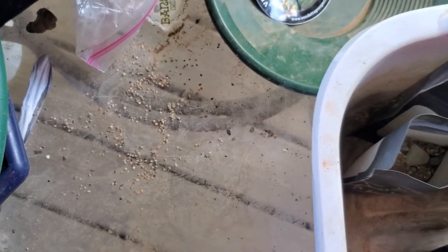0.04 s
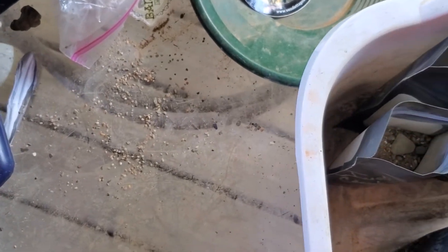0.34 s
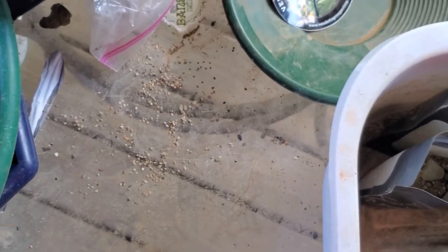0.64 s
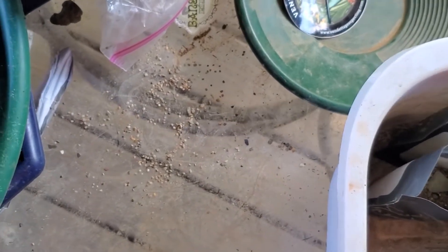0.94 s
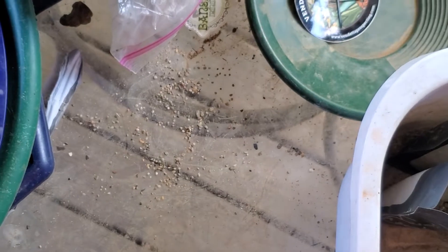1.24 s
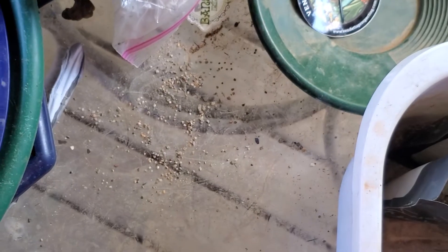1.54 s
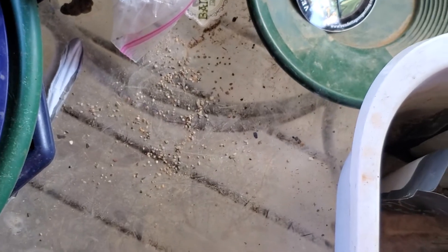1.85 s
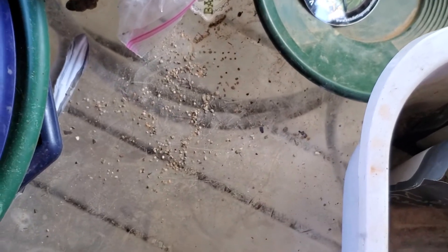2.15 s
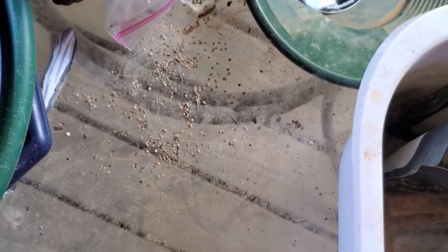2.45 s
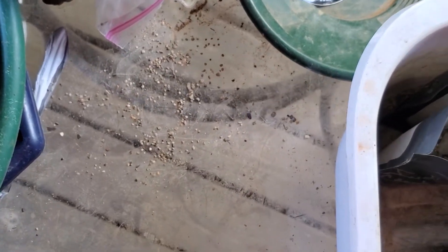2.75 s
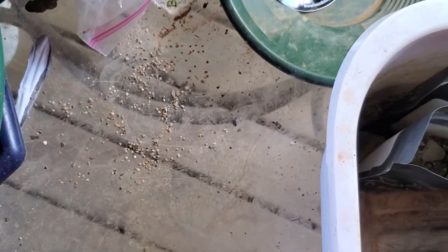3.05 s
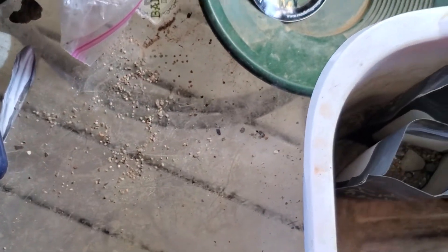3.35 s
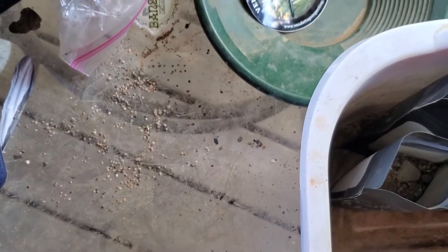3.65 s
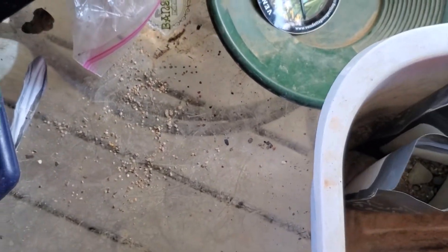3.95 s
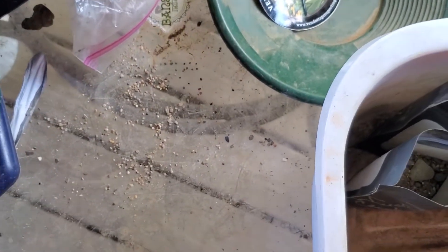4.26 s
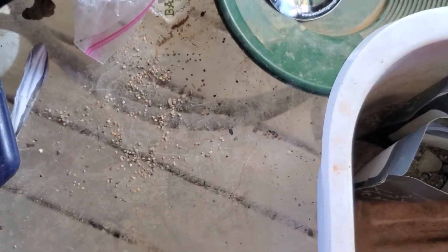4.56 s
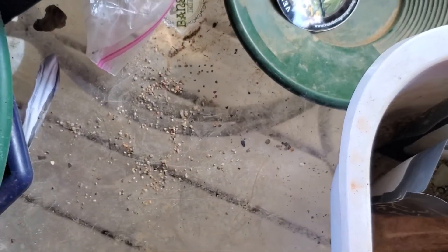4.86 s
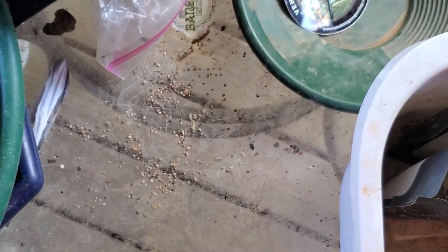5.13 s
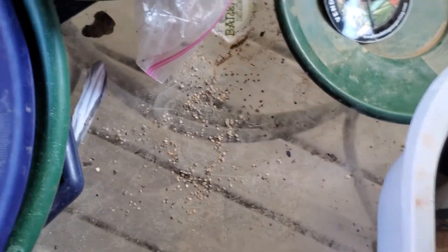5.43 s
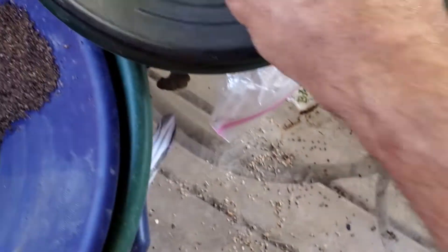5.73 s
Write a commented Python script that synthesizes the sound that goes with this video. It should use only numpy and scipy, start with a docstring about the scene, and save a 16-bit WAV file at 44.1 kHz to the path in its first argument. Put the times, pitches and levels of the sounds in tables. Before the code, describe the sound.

Small hard pieces and dirt are handled into plastic bags, with light clicks, crinkles and hollow taps over a low steady hum.

```python
"""Small hard pieces into plastic bags.

Pieces and dirt are handled close to a two-port microphone. Sliding plastic scuffs in tiny crackles,
flexing plastic snaps in rushes of stick-slips, pieces ring a hollow container, handling gives low bumps.
A distant motor hums in room noise; a fine high hiss, perhaps an insect, comes in spells and short zips."""
import sys
import numpy as np
from scipy import signal
from scipy.fft import rfft, irfft
from scipy.io import wavfile
from scipy.ndimage import uniform_filter1d, map_coordinates

SR = 44100
rng = np.random.default_rng(int(sys.argv[2]) if len(sys.argv) > 2 else 0)


def dump_mix(stems):
    """Bounce the given channels to the path in sys.argv[1] as a 16-bit WAV at rate SR."""
    frames = np.atleast_2d(stems).T  # one column per channel
    limited = np.clip(frames, -1, 1)  # hard clip at full scale
    pcm = np.round(limited * 32767).astype(np.int16)
    wavfile.write(sys.argv[1], SR, pcm)


N = 259749
TIME_S, FREQ_HZ = np.arange(N) / SR, np.fft.rfftfreq(N, 1 / SR)


def gain_of(db):
    """Decibels to amplitude."""
    return 10 ** (np.asarray(db) / 20)


def unit_rms(x):
    """Scale to rms 1."""
    return x / np.sqrt(np.mean(x ** 2) + 1e-20)


def at_hz(table, hz):
    """Interpolate on a log-frequency axis."""
    f, value = np.transpose(table)
    return np.interp(np.log(hz + 1), np.log(f + 1), value)


def add(mix, start_s, sound):
    """Mix a sound in at start_s."""
    part = mix[max(round(start_s * SR), 0):][:len(sound)]
    part += sound[:len(part)]


def coloured(x, spectrum):
    """Filter by a spectrum table; rms 1."""
    return unit_rms(irfft(rfft(x) * gain_of(at_hz(spectrum, FREQ_HZ)), N))


def drift(hz):
    """Random drift up to about hz; rms 1."""
    return unit_rms(irfft(rfft(rng.standard_normal(N)) * np.exp(-(FREQ_HZ / hz) ** 2), N))


def burst(x, db):
    """Scale to the energy of 5 ms at db."""
    return gain_of(db) * x / np.sqrt(np.sum(x ** 2) / (.005 * SR) + 1e-20)


# Room noise spectrum (frequency [Hz], gain [dB])
AIR_SPECTRUM = [(20, -27), (40, -2.5), (60, -3), (95, -7), (170, -9.5), (260, -17.5), (500, -21.5),
                (1000, -27.5), (1700, -27), (3300, -24), (4100, -26), (5100, -25), (5700, -33), (7400, -37),
                (16000, -54)]


def room_noise(start_db=-46.0, sink_db_per_s=0.51, swell_db=1, rumble_hz=70, shared_hz=700):
    """Slowly sinking noise: alike at both ports in the upper bass, unrelated in rumble and treble."""
    left, other = rfft(rng.standard_normal((2, N)))
    coherence = .9 / (1 + (FREQ_HZ / shared_hz) ** 4) * FREQ_HZ ** 2 / (FREQ_HZ ** 2 + rumble_hz ** 2)
    right = coherence * left + np.sqrt(1 - coherence ** 2) * other
    level_db = start_db - sink_db_per_s * TIME_S + swell_db * drift(0.49)
    return gain_of(level_db) * coloured(irfft(np.array([left, right]), N), AIR_SPECTRUM)


# Motor orders (multiple of motor speed, level [dB], width [Hz])
MOTOR_ORDERS = [(2, -51, 1.74), (3, -54, 2.3), (5, -73.5, 4.6)]


def motor_hum(motor_hz=67.8, drone_hz=57.6, drone_db=-49.5, drone_width_hz=14, waver=0.27):
    """Low orders of a distant motor over a rough drone, wavering in level and phase."""
    tones = [(order * motor_hz, db, width_hz) for order, db, width_hz in MOTOR_ORDERS]
    out = np.zeros(N)
    for hz, db, width_hz in tones + [(drone_hz, drone_db, drone_width_hz)]:
        amplitude = gain_of(db) * np.sqrt(2) * (1 + waver * drift(2 * width_hz))
        out += amplitude * np.sin(2 * np.pi * hz * TIME_S + 0.2 * drift(width_hz))
    return out


# Hiss spells (start [s], end [s], relative level [dB])
HISS_SPELLS = [(-0.6, 0.43, -45), (1.0, 2.68, -44.5), (3.2, 4.87, -46), (5.66, 7.0, -49.5)]


def spell_envelope(soft_db=-10, swell_s=0.62, fade_db_per_s=97, floor_db=-63):
    """Each spell starts soft, swells, holds and dies away to a faint floor."""
    envelope = gain_of(floor_db)
    for start_s, end_s, db in HISS_SPELLS:
        softness = np.clip(1 - (TIME_S - start_s) / swell_s, 0, 1)
        outside_s = np.maximum(np.maximum(start_s - TIME_S, TIME_S - end_s), 0)
        envelope = np.hypot(envelope, gain_of(db + soft_db * softness - fade_db_per_s * outside_s))
    return envelope


# Hiss spectrum (frequency [Hz], gain [dB])
HISS_SPECTRUM = [(5000, -11), (7500, -26), (9500, -15), (11000, -4), (12500, 5), (14000, 9), (15300, 8.5),
                 (16000, -34)]
# Steady narrow bands (centre [Hz], width [Hz], level [dB])
HISS_BANDS = [(8600, 310, -66.5), (15800, 390, -58.5)]
# Zips (start [s], hold [s], level [dB])
ZIP_EVENTS = [(0.87, 0.026, -41.5), (0.951, 0.065, -37.5), (1.077, 0.015, -40.5), (1.145, 0.016, -39),
              (3.159, 0.079, -37), (3.355, .01, -39), (3.436, .01, -44), (3.505, .01, -42),
              (5.501, .01, -43), (5.685, .01, -44), (5.741, .01, -42.5)]
# Zip spectrum (frequency [Hz], gain [dB])
ZIP_SPECTRUM = [(9000, -27), (11000, -13.5), (12300, -8), (13500, -1.5), (15000, 0), (16000, -17)]


def high_hiss(gain_db=2, flicker_db=1, echo=0.3, echo_s=0.001, rise_s=0.0025, fall_s=0.018):
    """Fine hiss, perhaps an insect: flickering spells and short zips over steady narrow bands."""
    wide, narrow, zip_noise = rng.standard_normal((3, 2, N))
    wide = wide + echo * np.roll(wide, round(echo_s * SR), axis=1)  # near reflection: comb filter
    out = spell_envelope() * gain_of(gain_db + flicker_db * drift(50)) * coloured(wide, HISS_SPECTRUM)
    for hz, width_hz, db in HISS_BANDS:
        band = np.exp(-((FREQ_HZ - hz) / width_hz) ** 2 / 2)
        out += gain_of(db) * unit_rms(irfft(rfft(narrow) * band, N))
    zip_envelope = np.zeros(N)
    t = TIME_S[:SR // 5]
    for start_s, hold_s, db in ZIP_EVENTS:
        attack = 1 - np.exp(-t / rise_s)
        release = np.exp(-np.maximum(t - hold_s, 0) / fall_s)
        add(zip_envelope, start_s, gain_of(db) * attack * release)
    return out + zip_envelope * coloured(zip_noise, ZIP_SPECTRUM)


# Handling bumps (time [s], pitch [Hz], level [dB])
BUMP_EVENTS = [(0.148, 60, -32.5), (0.249, 84, -31.5), (0.338, 71, -24), (0.394, 74, -22.5),
               (0.892, 66.4, -33.5), (1.316, 73.5, -25.5), (1.424, 220, -32), (2.639, 83, -37.5),
               (3.221, 187, -27.5), (3.24, 72.5, -35), (3.26, 157, -33), (3.758, 85, -30),
               (3.765, 176, -28.5), (3.784, 88.6, -23), (4.513, 111, -19.5), (4.547, 64, -30),
               (5.142, 73, -33.5), (5.265, 78, -31.5)]


def handling_bumps(cycles=1.53):
    """Each soft bump is a brief low sway under a Gaussian envelope."""
    out = np.zeros(N)
    for time_s, hz, db in BUMP_EVENTS:
        length_s = cycles / hz
        near = abs(TIME_S - time_s) < 2 * length_s
        t = TIME_S[near] - time_s
        envelope = gain_of(db) * np.sqrt(2) * np.exp(-(2 * t / length_s) ** 2)
        out[near] += envelope * np.cos(2 * np.pi * (hz * t + rng.random()))
    return out


def crackle(per_s, spread_db):
    """Random train of tiny, uneven impulses."""
    sizes = gain_of(spread_db * np.minimum(rng.exponential(1, N), 3)) * rng.choice([-1, 1], N)
    return unit_rms(sizes * (rng.random(N) < per_s / SR))


def plastic_response(spectrum, pitch_hz, ring_db, width_oct):
    """Minimum-phase impulse response of thin flexing plastic, ringing broadly around pitch_hz."""
    f = abs(np.fft.fftfreq(1024, 1 / SR))
    lift_db = ring_db / (1 + (np.log2((f + 1) / pitch_hz) / width_oct) ** 2)
    log_gain = np.log(gain_of(at_hz(spectrum, f) + lift_db))
    response = np.fft.ifft(np.exp(np.conj(signal.hilbert(log_gain)))).real
    return response / np.linalg.norm(response)


# Strokes of plastic and grit (start [s], end [s], relative level [dB], pitch [Hz], ring [dB])
SCUFF_STROKES = [(0.28, 0.349, -45, 1500, 12), (0.324, 0.47, -45.5, 3520, 6.5), (0.44, 0.636, -50, 3490, 2),
                 (0.931, 1.05, -41, 3600, 6.5), (1.012, 1.334, -52, 2030, 4), (1.35, 1.452, -48, 1920, -4),
                 (1.58, 1.723, -50, 2200, 0), (1.926, 2.21, -52, 2730, 5), (2.474, 2.669, -43, 3630, 1.5),
                 (2.65, 2.884, -48.5, 2050, -1), (2.98, 3.105, -48, 3400, 1),
                 (3.107, 3.29, -42.5, 3780, 5.5), (3.756, 3.915, -44.5, 3040, 2),
                 (4.399, 4.428, -41, 1850, 6), (4.468, 4.542, -38, 1160, -3),
                 (4.587, 4.683, -51, 1770, -10), (4.876, 4.904, -46.5, 1650, 3),
                 (4.923, 4.967, -42.5, 2070, -2), (5.026, 5.346, -52, 1500, -21)]
# Scuff spectrum (frequency [Hz], gain [dB])
SCUFF_SPECTRUM = [(100, -4.5), (300, 9.5), (700, 6.5), (1100, 5.5), (2000, 7), (3000, 5.5), (3700, 3.5),
                  (4500, -2.5), (6000, -4), (7500, -9.5), (10000, -8.5), (13000, -6.5), (16000, -24)]


def plastic_scuffs(gain_db=3.5, clump_db=2.5, crinkle_db=-3):
    """Sliding plastic sheds clumps of tiny crackles and sparser, crisper crinkles."""
    grains = unit_rms(crackle(per_s=800, spread_db=2) * gain_of(clump_db * drift(110)))
    grains += gain_of(crinkle_db) * crackle(per_s=70, spread_db=4.5)
    out = np.zeros(N)
    for start_s, end_s, db, pitch_hz, ring_db in SCUFF_STROKES:
        stroke = unit_rms(grains[round(start_s * SR):][:round((end_s - start_s) * SR)])
        envelope = gain_of(db + gain_db) * signal.windows.tukey(len(stroke), 0.42)
        plastic = plastic_response(SCUFF_SPECTRUM, pitch_hz, ring_db, width_oct=0.34)
        add(out, start_s, signal.fftconvolve(stroke * envelope, plastic))
    return out


def stick_slips(envelope, whitening=0.47, smooth_hz=500):
    """A rush of tiny stick-slips, its spectrum partly flattened."""
    n = len(envelope)
    spectrum = rfft(rng.choice([-1., 1.], n) * envelope, 2 * n)
    power = uniform_filter1d(abs(spectrum) ** 2, round(smooth_hz * 2 * n / SR))
    log_gain = -whitening * np.log(np.r_[power, power[-2:0:-1]] + 1e-12) / 2
    flattener = np.exp(np.conj(signal.hilbert(log_gain)))[:len(spectrum)]  # minimum phase
    return irfft(spectrum * flattener)[:n]


# Contacts (time [s], crack [dB], plastic pitch [Hz], ring [dB], tick [dB], knock [dB], knock centre [Hz])
CONTACTS = [(0.326, -35.5, 3550, 17, -29, -55, 330), (0.425, -22, 3490, 12, -25, -37, 340),
            (0.434, -27.5, 3600, 5, -33, -32.5, 368), (0.4985, -30, 1460, 8, -26.5, -39, 650),
            (0.578, -34, 3240, 5, -47, -29, 272), (0.7646, -28.5, 1420, 0, -37, -39.5, 785),
            (0.8185, -28, 3660, 9, -27, -55, 680), (0.9815, -34, 3100, 13, -30, -50, 390),
            (1.0038, -31, 3700, 18, -23.5, -49, 430), (1.106, -31.5, 3570, 15, -39, -46, 480),
            (1.145, -31.5, 1880, 4, -46, -37, 580), (1.2557, -34, 1380, 12, -55, -27.5, 387),
            (1.4, -30, 1980, 5, -30.5, -32, 380), (1.4177, -38, 2020, 14, -39, -30.5, 293),
            (1.6209, -19, 3180, 9.5, -39, -28.5, 476), (1.9584, -30.5, 1920, 20, -61, -32.5, 770),
            (2.5454, -39, 3580, -14, -11.5, -58, 520), (2.6, -23, 3700, 10.5, -45, -32.5, 570),
            (2.617, -34, 2520, 14, -30, -34.5, 990), (2.6309, -26.5, 3800, 1, -44, -38, 630),
            (2.6582, -30, 1800, 9, -49, -34.5, 734), (2.734, -39.5, 1790, 16, -56, -35, 530),
            (2.815, -25.5, 3400, 8, -28, -31, 350), (2.8215, -30, 3470, 7, -40, -35.5, 490),
            (2.834, -23, 1700, 0, -25, -30.5, 400), (3.216, -30.5, 3600, 17, -28, -31.5, 530),
            (3.2758, -24, 3400, -3, -50, -39, 402), (3.2796, -28, 3660, 21, -29.5, -54, 320),
            (3.7274, -30.5, 2300, 12, -32, -30.5, 404), (3.7507, -8.5, 1120, 1, -11, -18.5, 750),
            (3.7694, -25, 2000, 18, -33, -27.5, 415), (3.8161, -18.5, 3160, 6.5, -14.5, -28.5, 1080),
            (3.8414, -23.5, 1530, 8, -31, -47, 910), (3.85, -21, 3140, 3, -29, -33.5, 860),
            (3.9879, -37, 2660, 11, -66, -42.5, 1010), (4.4818, -29, 2880, 3, -49, -44, 430),
            (4.4948, -22, 1300, 4.5, -19, -15.5, 402), (4.645, -32, 1690, 6, -29.5, -39.5, 895),
            (4.9508, -32.5, 1880, -4, -35, -39, 377), (5.0165, -37.5, 1980, 1, -38, -32, 368),
            (5.0317, -21, 2380, -1.5, -17, -20, 414), (5.0756, -26, 2560, 13.5, -48, -31, 1030),
            (5.1443, -39, 2140, 16, -44, -42, 400), (5.2097, -17.5, 3500, 2.5, -17, -19, 342),
            (5.323, -36, 1770, 6, -46, -24.5, 370)]
# Crack spectrum (frequency [Hz], gain [dB])
CRACK_SPECTRUM = [(150, 3), (500, -7), (800, -9), (950, -9), (1150, 0.5), (1400, 3), (2000, 4.5), (2800, 1),
                  (3500, 2), (4400, -3), (5100, -6), (5900, -8), (7000, -23.5), (12000, -23)]
# Tick spectrum (frequency [Hz], gain [dB])
TICK_SPECTRUM = [(2000, -5), (4500, -4), (6000, 3), (7500, -11), (9000, -7.5), (11000, 0), (13500, 2),
                 (15500, 5.5), (17000, 8.5)]


def plastic_snaps(graze_db=-22, graze_s=0.0055, slip_s=0.0033, settle=0.037, settle_s=0.0042):
    """Each contact grazes the plastic, then snaps it in a rush of slips: a crack with a bright tick."""
    t = TIME_S[:SR // 10]
    swell = np.exp((t - t[-1]) / graze_s)
    rush = np.sin(np.pi * np.minimum(t / slip_s, 1) ** 1.05) + settle * np.exp(-t / settle_s)
    out = np.zeros(N)
    for time_s, crack_db, pitch_hz, ring_db, tick_db, _, _ in CONTACTS:
        for spectrum, db in (CRACK_SPECTRUM, crack_db), (TICK_SPECTRUM, tick_db):
            plastic = plastic_response(spectrum, pitch_hz, ring_db, width_oct=.24)
            graze = signal.fftconvolve(swell * rng.standard_normal(len(t)), plastic)
            snap = signal.fftconvolve(stick_slips(rush), plastic)
            add(out, time_s - t[-1], burst(graze, db + graze_db))
            add(out, time_s, burst(snap, db))
    return out


# Container modes (frequency [Hz], gain [dB], t60 [s])
CONTAINER_MODES = [(212, -2.5, 0.12), (282, 5, 0.07), (333, -3, 0.036), (383, 0, 0.085), (527, -0.5, 0.056),
                   (633, 6, 0.049), (715, 6, 0.035), (770, 2.5, 0.07), (854, 7, 0.022), (1122, 5, 0.053)]


def container_knocks(detune=0.05, push_s=0.0001, reach_oct=0.66):
    """The same contacts ring the hollow container; the place struck decides which modes answer most."""
    t = TIME_S[:SR // 8]
    attack = 1 - np.exp(-t / push_s)
    out = np.zeros(N)
    for time_s, *_, knock_db, centre_hz in CONTACTS:
        tuning = 1 + detune * rng.standard_normal(len(CONTAINER_MODES))
        ring = np.zeros(len(t))
        for k, (hz, db, t60_s) in enumerate(CONTAINER_MODES):
            weight = (-1) ** k / (1 + (np.log2(hz / centre_hz) / reach_oct) ** 2)
            ring += weight * gain_of(db - 60 * t / t60_s) * np.sin(2 * np.pi * hz * tuning[k] * t)
        add(out, time_s, burst(ring * attack, knock_db))
    return out


# Room decay (frequency [Hz], t60 [s])
ROOM_T60 = [(150, 0.26), (700, 0.45), (2500, 0.36), (6000, 0.37), (14000, 0.5)]


def room_reflections(x, early_db=-6, early_s=0.0055, tail_db=-11, taps_per_s=4000):
    """Quick reflections from floor and tubs, then a short diffuse tail."""
    t = TIME_S[:SR // 2]
    shape = (2, 2, len(t))  # early/tail, port, time
    taps = rng.standard_normal(shape) * (rng.random(shape) < taps_per_s / SR) * (t > .002)
    early = taps[0] * np.exp(-t / early_s)
    hz, age_s, frames = signal.stft(taps[1], SR, nperseg=256)
    decay = gain_of(-60 * age_s / at_hz(ROOM_T60, hz)[:, None])
    tail = signal.istft(frames * decay, SR, nperseg=256)[1][:, :len(t)]
    response = sum(gain_of(db) * part / np.linalg.norm(part, axis=1, keepdims=True)
                   for db, part in [(early_db, early), (tail_db, tail)])
    return signal.oaconvolve(x[None], response, axes=1)[:, :N]


def from_right(x, delay_s):
    """Sound from the right reaches the left port late."""
    return np.array([map_coordinates(x, [np.arange(N) - delay_s * SR]), x])


# Hands shifting to the right (time [s], left port delay [s])
HAND_PATH = [(0, 0.00015), (1.7, .00016), (2.5, 0.00028), (5.3, .00035)]


def scene(wander_s=.00004, wander_hz=4.4, knock_delay_s=.0001):
    """Wandering hands and a container close by, in a small room with hum and hiss."""
    plastic = plastic_snaps() + plastic_scuffs()
    knocks = container_knocks()
    hand_delay_s = np.interp(TIME_S, *np.transpose(HAND_PATH)) + wander_s * drift(wander_hz)
    direct = from_right(plastic, hand_delay_s) + from_right(knocks, knock_delay_s)
    reflected = room_reflections(plastic + knocks)
    return direct + reflected + handling_bumps() + motor_hum() + room_noise() + high_hiss()


# Port balance (frequency [Hz], left minus right [dB])
PORT_BALANCE = [(30, 1), (70, -21), (130, -2), (400, -5), (800, -1), (1300, 2), (2300, 2), (3500, 6),
                (4800, -2), (6000, -8.5), (8000, -12), (11000, -5.5), (15000, -24.5)]


def record(dry, ceiling=.78, cutoff_hz=15950):
    """Left port favours the mids, right port bass and treble; then soft clip and low-pass."""
    ratio = gain_of(at_hz(PORT_BALANCE, FREQ_HZ))
    port_gains = np.array([ratio, np.ones_like(ratio)]) * np.sqrt(2 / (1 + ratio ** 2))
    heard = irfft(rfft(dry) * port_gains, N)
    rounded = heard / (1 + (heard / ceiling) ** 4) ** .25
    lowpass = signal.firwin(511, cutoff_hz, window=("kaiser", 9), fs=SR)
    return signal.oaconvolve(rounded, lowpass[None], "same")


dry = scene()
out = record(dry)
dump_mix(out)
```